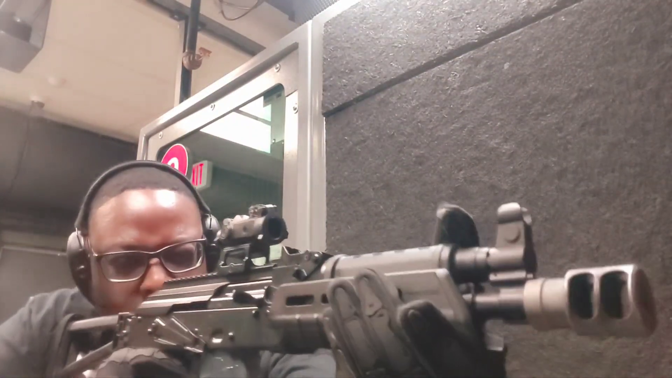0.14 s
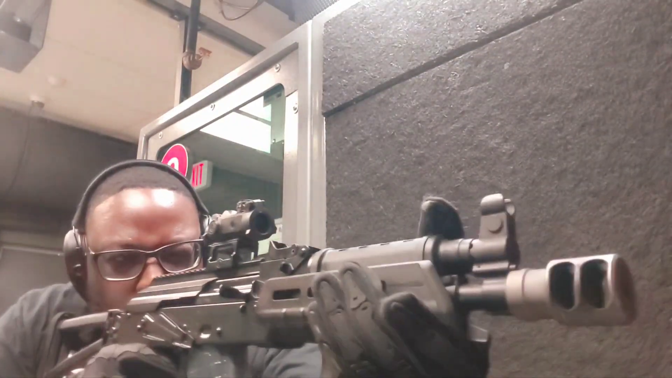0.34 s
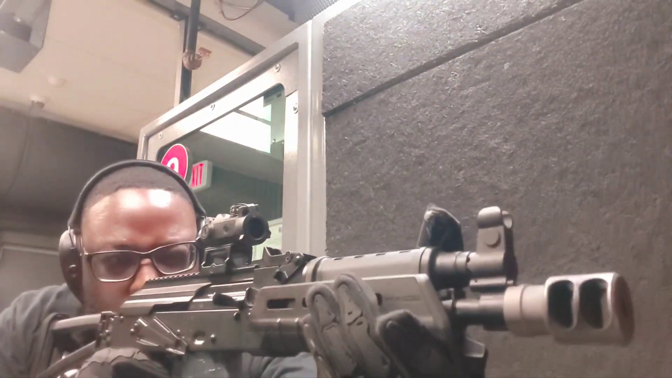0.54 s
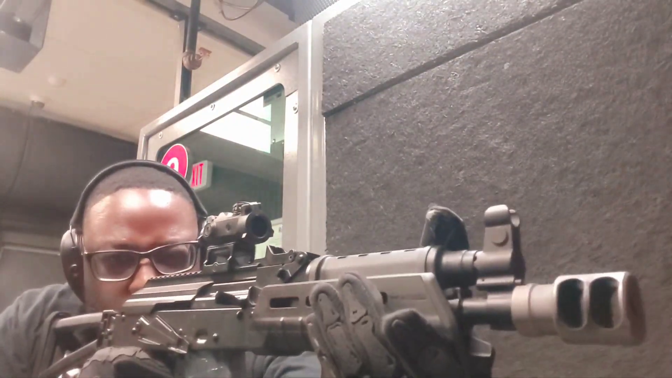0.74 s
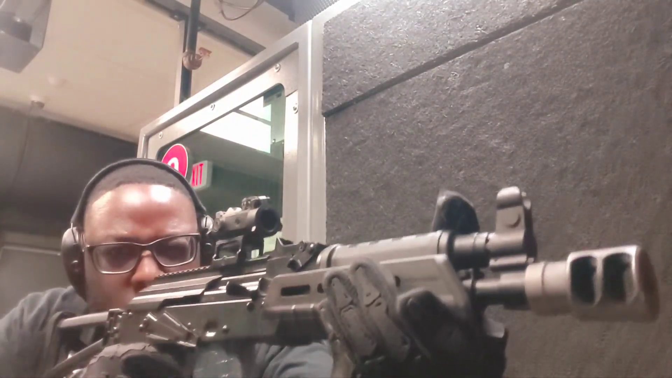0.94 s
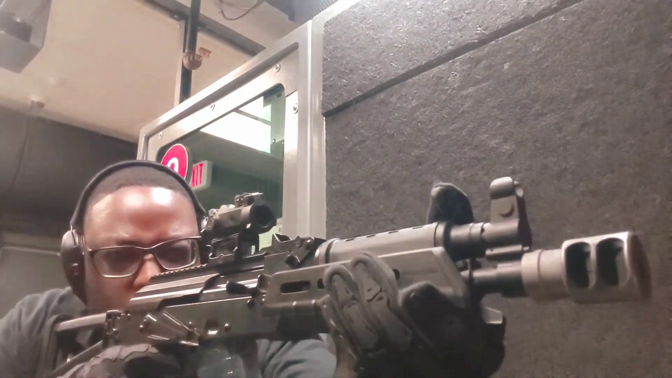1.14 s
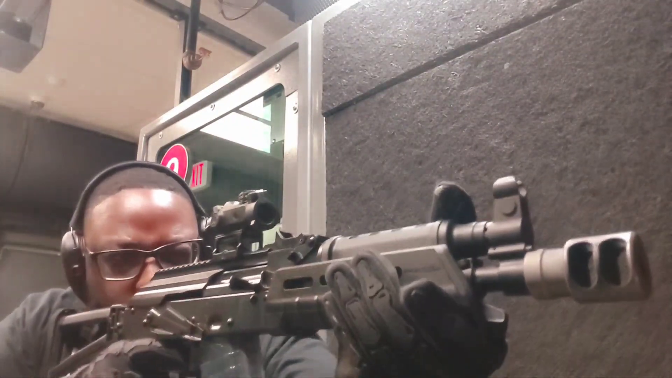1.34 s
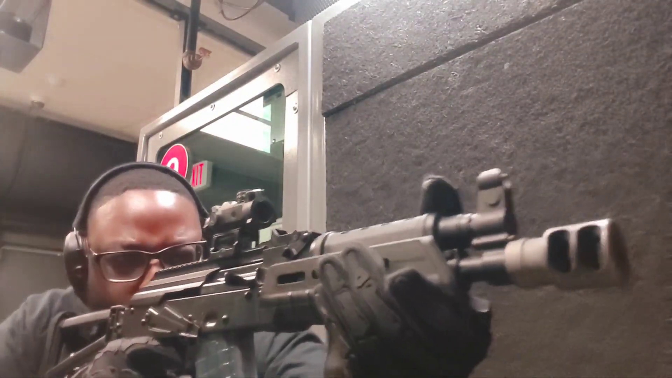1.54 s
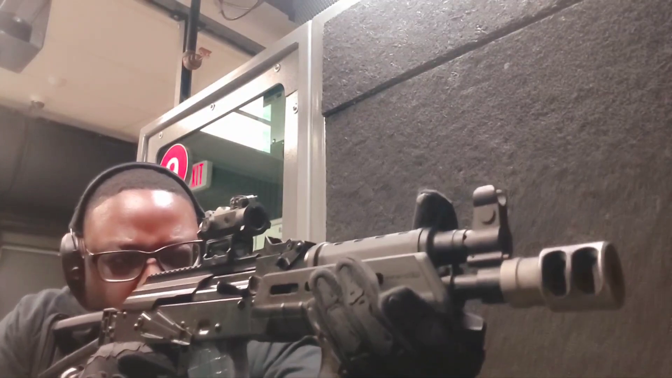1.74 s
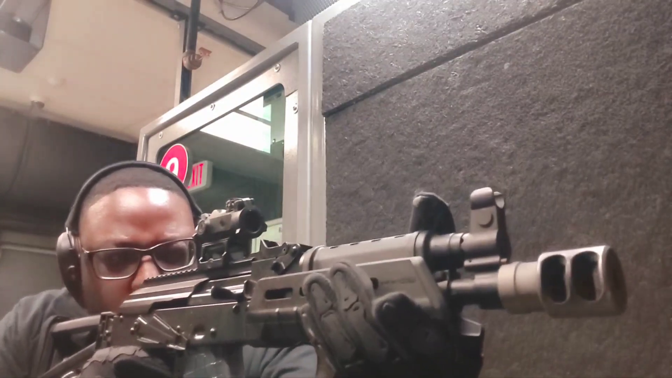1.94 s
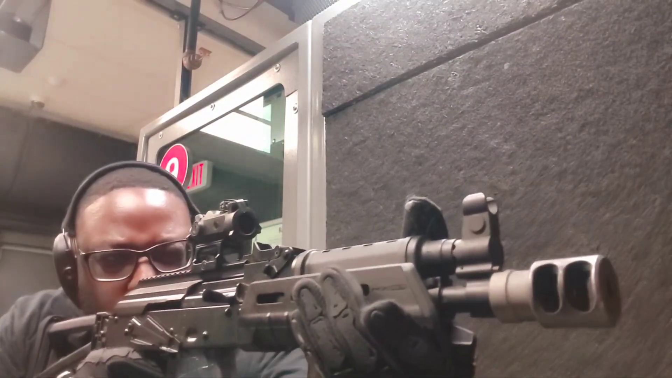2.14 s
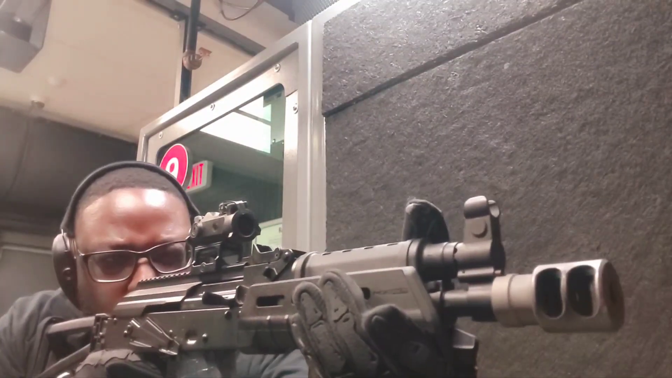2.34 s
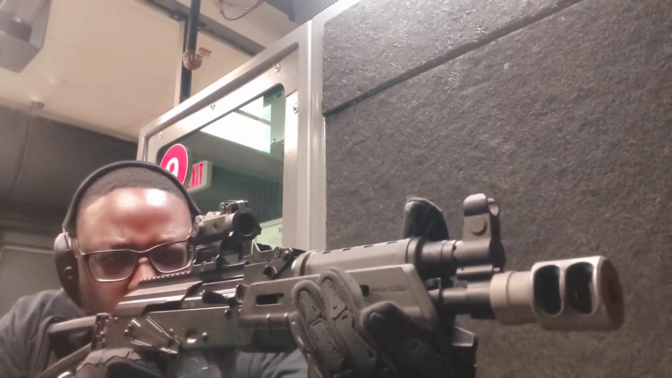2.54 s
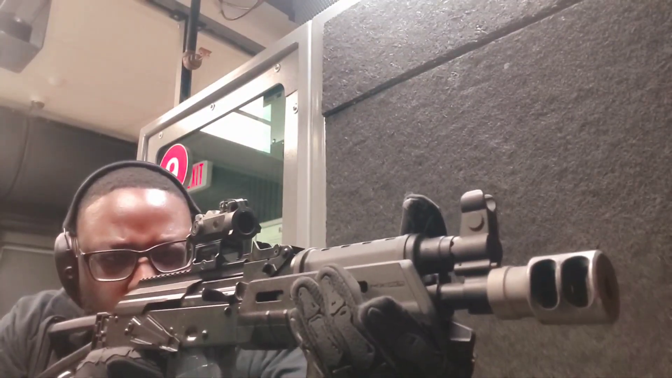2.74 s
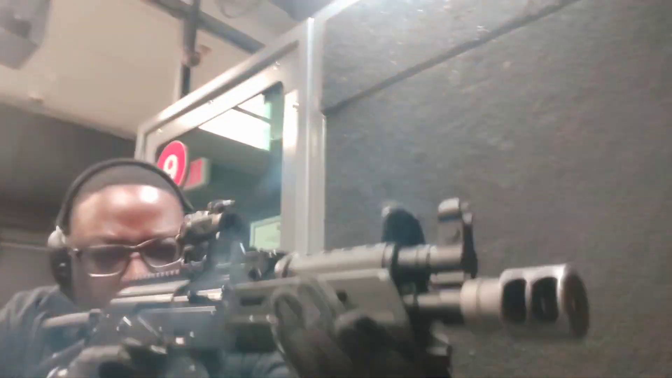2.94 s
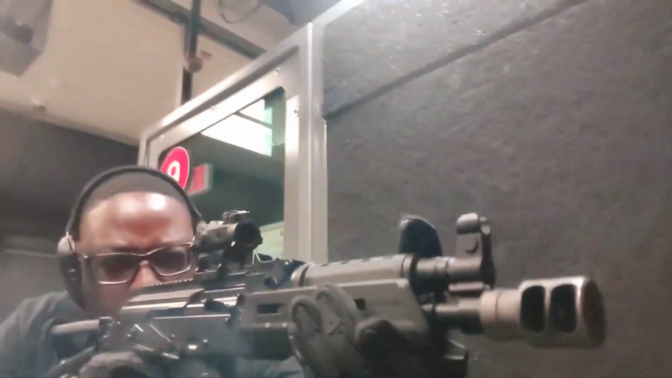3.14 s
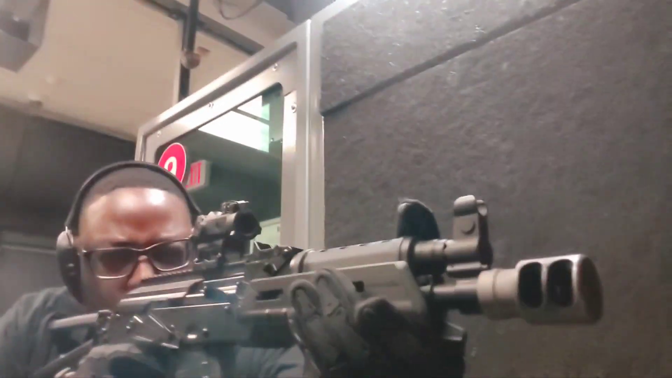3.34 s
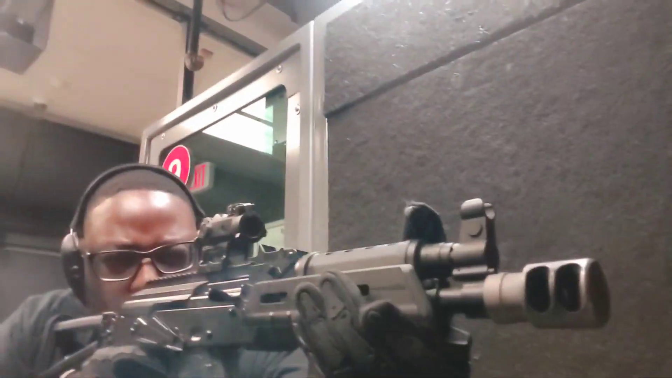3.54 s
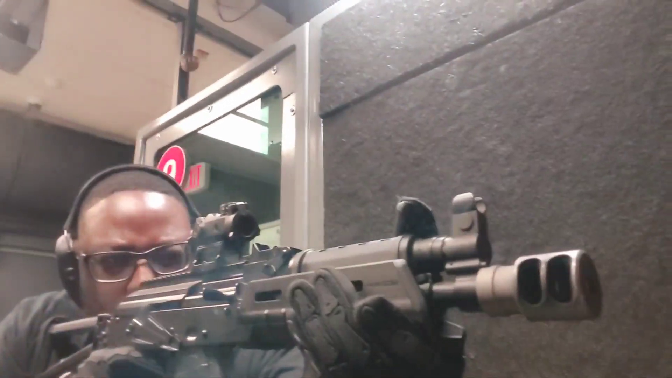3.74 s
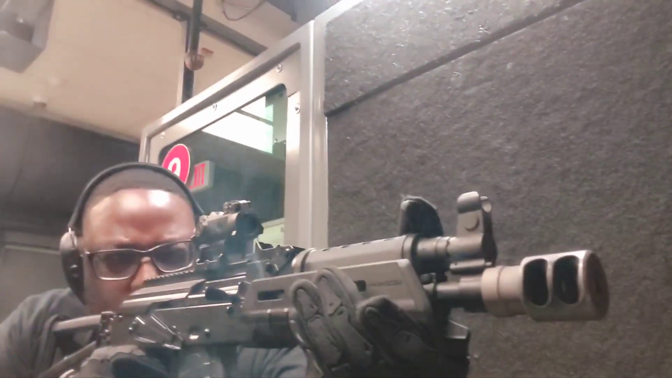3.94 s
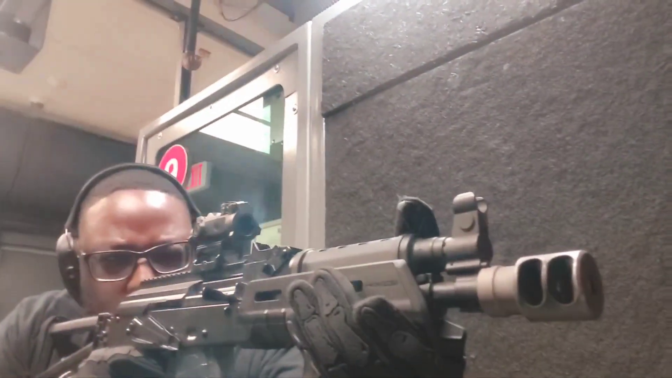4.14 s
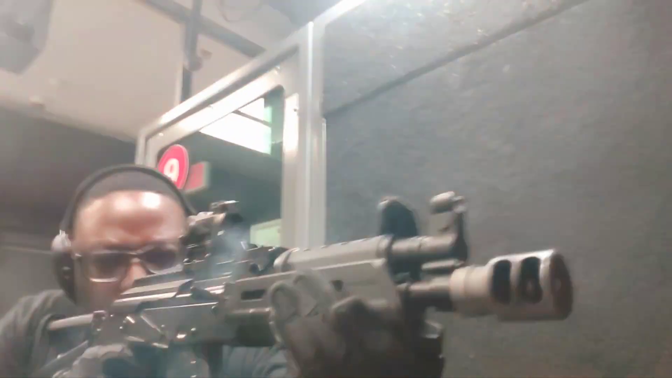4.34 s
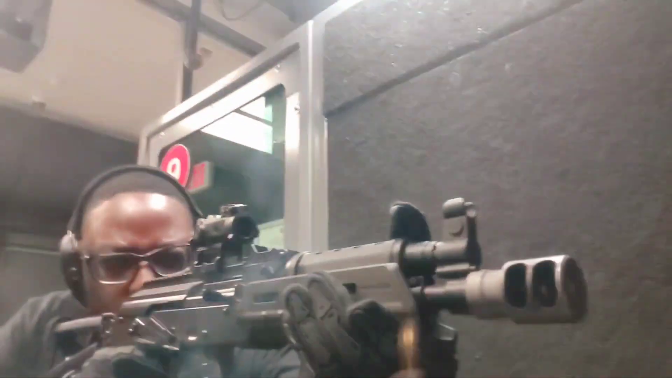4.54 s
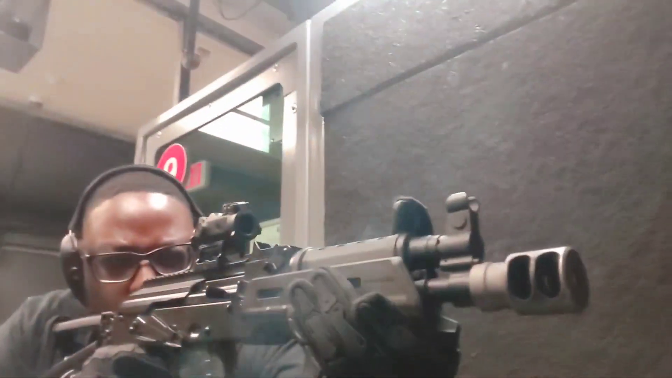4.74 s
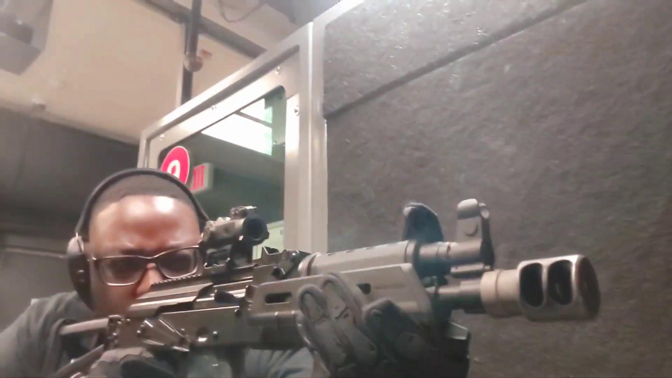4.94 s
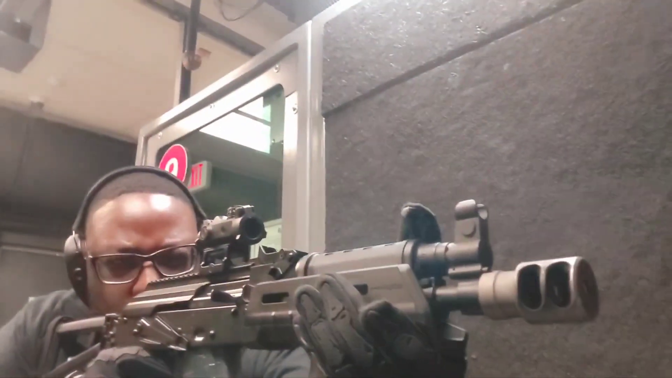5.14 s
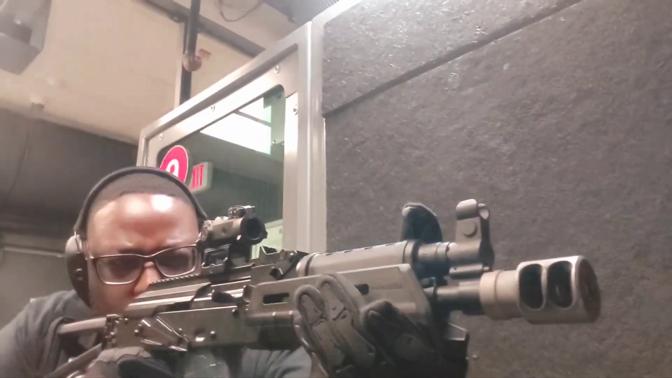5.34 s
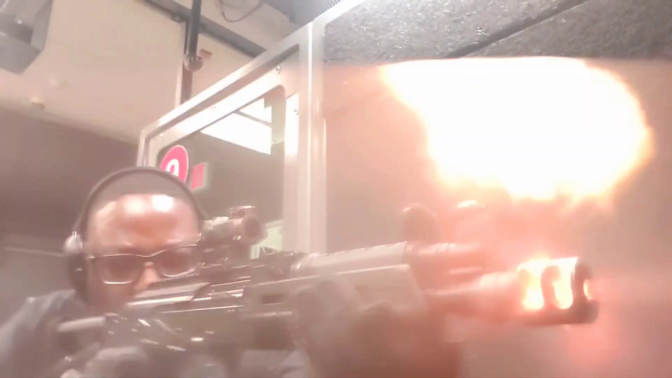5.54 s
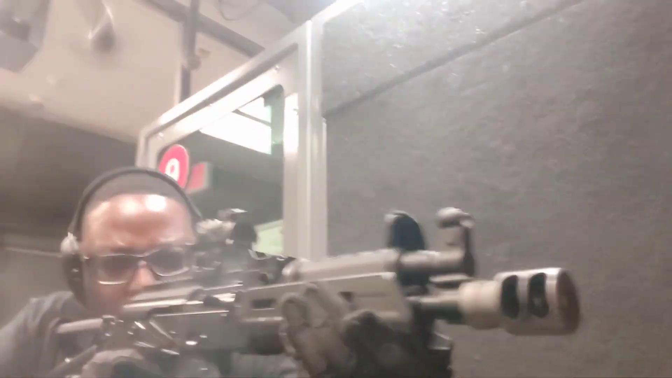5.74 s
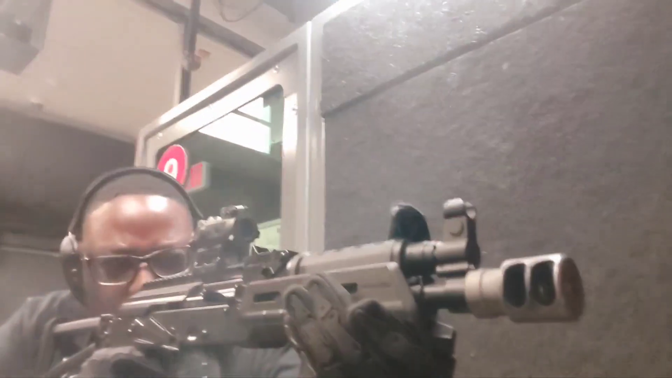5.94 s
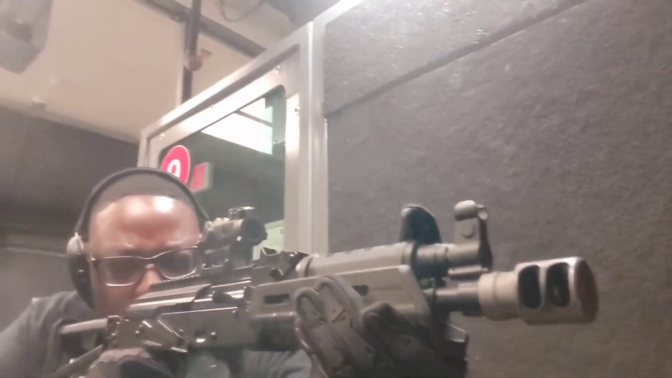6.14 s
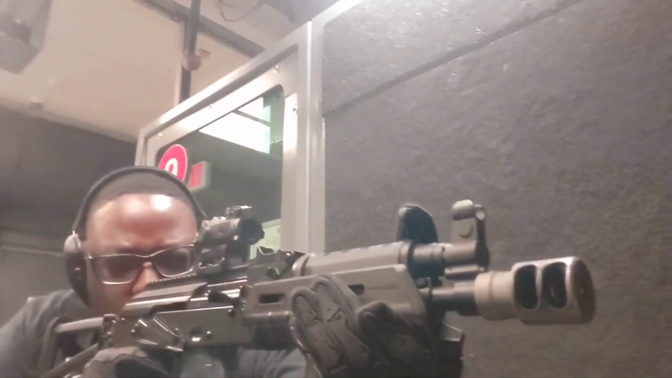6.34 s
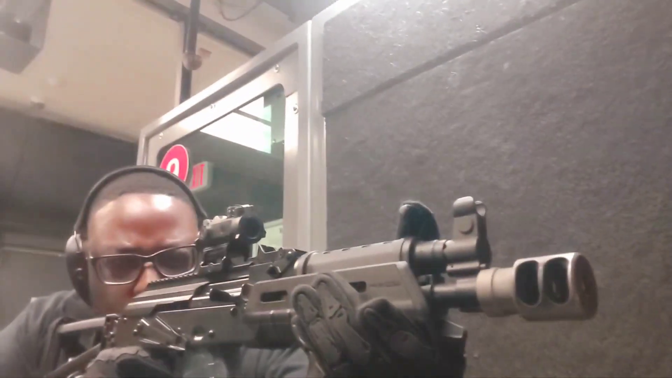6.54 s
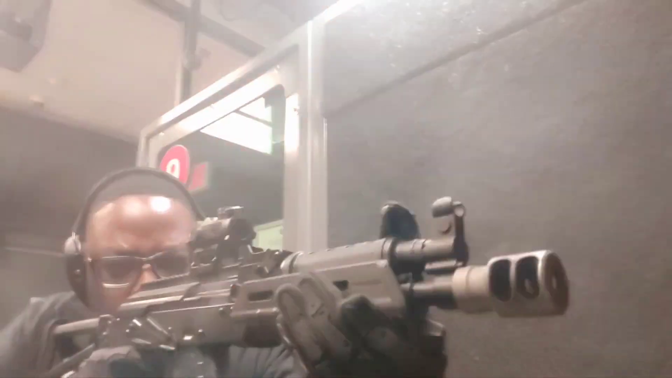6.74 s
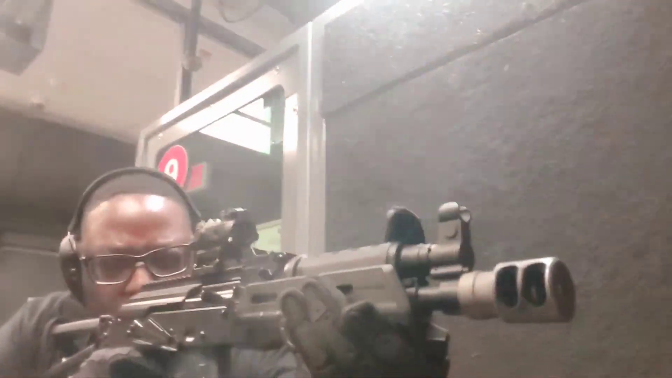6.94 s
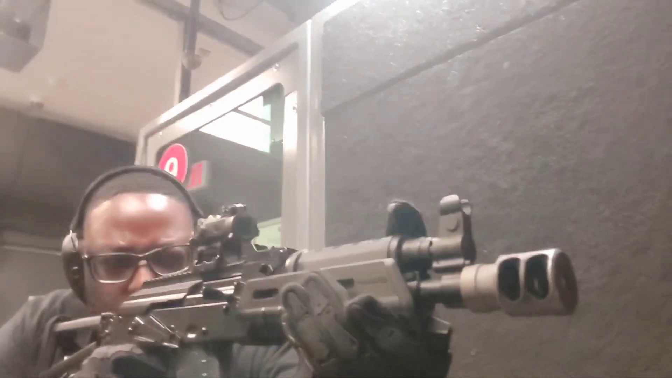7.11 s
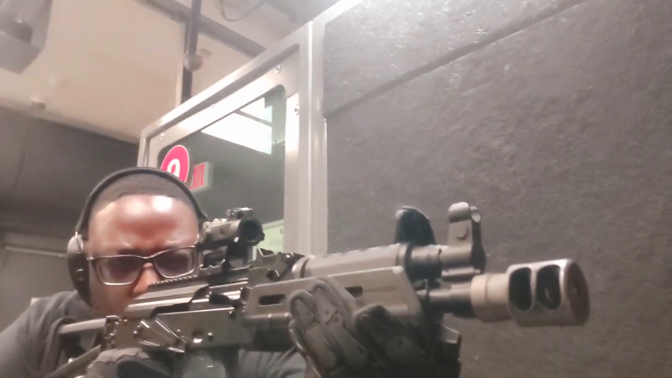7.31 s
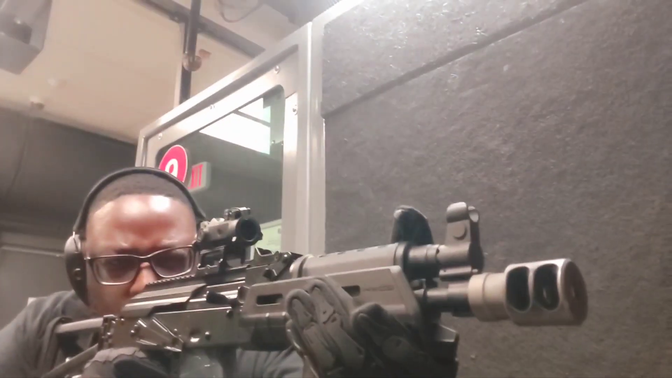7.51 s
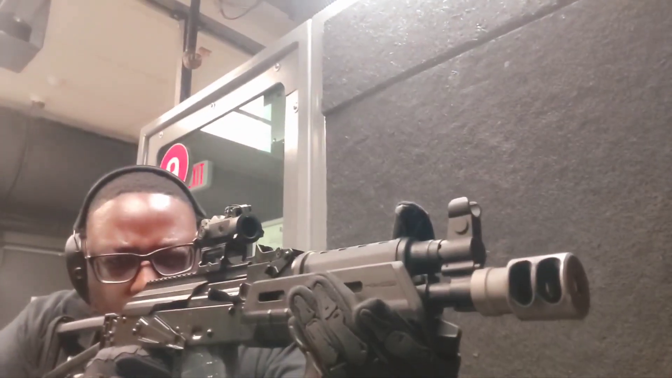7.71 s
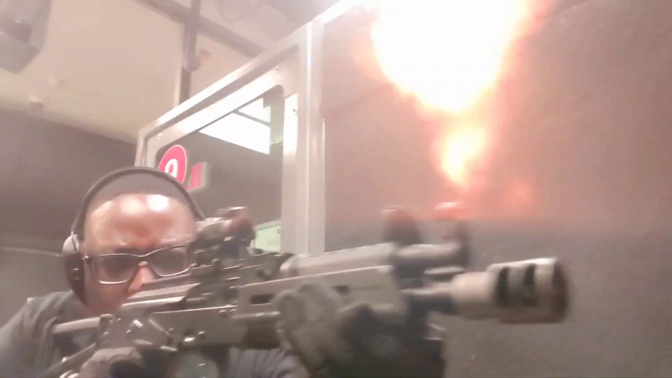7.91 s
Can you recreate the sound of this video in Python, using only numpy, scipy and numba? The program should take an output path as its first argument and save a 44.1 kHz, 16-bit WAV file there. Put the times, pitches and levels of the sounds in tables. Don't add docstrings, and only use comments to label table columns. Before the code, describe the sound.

In an indoor shooting range, five close rifle shots overload the microphone with roaring blasts and long echoes, amid far pistol shots and clinking brass.

```python
import sys
import numpy as np
from scipy import signal
from scipy.fft import rfft, irfft
from scipy.io import wavfile
from scipy.ndimage import uniform_filter1d
from numba import njit

SR = 44100
rng = np.random.default_rng(int(sys.argv[2]) if len(sys.argv) > 2 else 0)


def magnitude_from_level(level_db):
    exponent = np.asarray(level_db, float) / 20
    return 10 ** exponent


def wav_out(sig):
    wavfile.write(sys.argv[1], SR, np.round(np.clip(np.atleast_2d(sig).T, -1, 1) * 32767).astype(np.int16))


N = 355887
HOP = 64


def table(rows, hz):
    f, v = np.transpose(rows)[:2]
    return np.interp(np.log(hz), np.log(f), v)


def shares_db(rows, hz):
    power = 10 ** (table(rows, hz) / 10) * hz
    return 10 * np.log10(power / power.sum())


def modes(rows):
    t = np.arange(int(SR * max(row[2] for row in rows))) / SR
    return sum(magnitude_from_level(db - 60 * t / t60) * np.sin(2 * np.pi * hz * t) for hz, db, t60 in rows)


def walk(rate, size):
    k = max(int(SR / HOP / rate), 1)
    steps = np.repeat(rng.standard_normal(size // k + 1), k)
    return 1.3 * uniform_filter1d(steps, k)[:size]


def strikes(sound, rows, db):
    out = np.zeros(N + SR + len(sound))
    for row, gain in zip(rows, magnitude_from_level(db + np.zeros(len(rows)))):
        start = int(row[0] * SR) + SR
        out[start:start + len(sound)] += gain * sound
    return out[SR:SR + N]


# [f/Hz, level/dB]
FAN_COLOUR = [(15, -46), (25, -16), (76, 0), (249, -5), (331, -12), (527, -12), (776, -23), (1000, -16),
              (3380, -31), (9000, -55), (12000, -57), (15600, -64), (17000, -110)]
AIR_LOW_DB, AIR_HIGH_DB, AIR_DUCKED_DB = -62, -39, -60
AIR_OPENS_S, AIR_RISE_S = .97, .17


def ventilation_power(s, hz):
    opening = 1 / (1 + np.exp((AIR_OPENS_S - s) / AIR_RISE_S))
    swell_db = AIR_LOW_DB + (AIR_HIGH_DB - AIR_LOW_DB) * opening
    air_db = np.where(s < FAR_SHOTS[1][0], swell_db, AIR_DUCKED_DB)
    return magnitude_from_level(2 * (shares_db(FAN_COLOUR, hz)[:, None] + air_db))


# [t/s, level/dB]
TINKLES = [(.262, -80), (.70, -82), (.935, -73), (1.115, -75), (1.235, -76), (2.765, -72), (3.29, -86),
           (3.455, -85), (3.575, -87), (5.197, -80), (5.438, -84), (3.72, -89), (7.39, -90), (7.55, -86)]
# [f/Hz, level/dB, t60/s]
TINKLE_TONES = [(10760, 0.1, .5), (10830, -2, .4), (10680, -5, .3)]
TINKLE_ATTACK_S, TINKLE_HISS_DB, TINKLE_HISS_T60_S = .012, -13, .5


def tinkles():
    ring = modes(TINKLE_TONES)
    t = np.arange(len(ring)) / SR
    hiss = np.diff(rng.standard_normal(SR))[:len(t)]
    hiss = hiss * magnitude_from_level(TINKLE_HISS_DB - 60 * t / TINKLE_HISS_T60_S)
    waver = np.repeat(magnitude_from_level(3 * walk(70, N // HOP + 1)), HOP)
    waver = uniform_filter1d(waver, size=300)[:N]
    soft_start = 1 - np.exp(-t / TINKLE_ATTACK_S)
    far = strikes((ring + hiss) * soft_start, TINKLES, np.transpose(TINKLES)[1])
    return waver * far * magnitude_from_level(np.array([[0.5], [6]]))


# [t/s, level/dB]
RUSTLES = [
    (.695, -61),
    (1.24, -68),
    (2.75, -60),
]
SLING_HZ, SLING_WIDTH_HZ, SLING_T60_S = 5200, 600, .4
HAMMER_LEAD_S, HAMMER_DB = .0065, -42


def trigger():
    t = np.arange(int(SR * HAMMER_LEAD_S)) / SR
    scrape = np.diff(rng.standard_normal(SR // 50))[:len(t)] * (.3 + t / HAMMER_LEAD_S)
    lock = strikes(scrape, np.array(NEAR_SHOTS) - HAMMER_LEAD_S, HAMMER_DB)
    t = np.arange(SR // 4) / SR
    band = signal.iirpeak(SLING_HZ, SLING_HZ / SLING_WIDTH_HZ, fs=SR)
    crackle = magnitude_from_level(3.0 * rng.standard_normal(len(t) // HOP + 1).repeat(HOP)[:len(t)])
    rustle = signal.lfilter(*band, rng.standard_normal(len(t)) * crackle)
    strap = strikes(rustle * magnitude_from_level(-60 * t / SLING_T60_S), RUSTLES, np.transpose(RUSTLES)[1])
    return (lock + strap) * magnitude_from_level(np.array([[-6], [3]]))


# [t/s, click level/dB, ring level/dB]
CASE_HITS = [(2.9924, -24, -55), (4.3944, -21, -50), (4.5276, -30, -53), (4.5334, -33, -54),
             (4.7446, -24, -35), (4.7574, -35, -39), (4.7684, -36, -53), (4.7915, -45, -61),
             (4.8559, -49, -54), (4.9414, -64, -54), (4.9726, -38, -43), (4.993, -54, -62),
             (6.0057, -36, -37), (6.3194, -34, -55), (6.8934, -22, -54), (7.0224, -23, -54),
             (7.0274, -17, -48), (7.2848, -39, -52), (7.3244, -48, -56), (7.6116, -51, -71),
             (7.783, -64, -54), (7.7912, -58, -53)]
# [f/Hz, level/dB, t60/s]
BRASS_TONES = [(12750, -9, .12), (13180, -1, .07), (13330, -8, .04), (12930, -7, .33), (8200, -10, .025),
               (5100, -10, .035), (2900, -6, .035)]
# [t/s, level/dB]
PANEL_KNOCKS = [
    (4.758, -36),
    (4.794, -29),
    (4.812, -36),
    (7.575, -56),
]
# [f/Hz, level/dB, t60/s]
PANEL_TONES = [(420, 0.1, .05), (610, -3, .04), (720, -2, .04)]
# [f/Hz, level/dB, t60/s]
CLANK_TONES = [(1850, -3, .02), (2140, 0.1, .03), (2450, -4, .02), (2900, -6, .02)]
CLANK_S, CLANK_DB = 7.027, -20
CASE_PAN_DB = -8
CLICK_T60_S, CLICK_TAIL_T60_S, CLICK_TAIL_DB, RING_ATTACK_S = .009, .2, -26, .003
ROLL_S, ROLL_TURNS, TURN_S, TURN_WOBBLE_S = 5.105, 7, .057, .012
ROLL_CLICK_DB, ROLL_RING_DB, ROLL_FADE_DB, TURN_WOBBLE_DB = -72, -66, -.6, 3.5


def cases():
    turn = np.arange(ROLL_TURNS)[:, None]
    roll = [ROLL_S, ROLL_CLICK_DB, ROLL_RING_DB] + turn * [TURN_S, ROLL_FADE_DB, ROLL_FADE_DB]
    wobble = rng.standard_normal((ROLL_TURNS, 3)) * [TURN_WOBBLE_S, TURN_WOBBLE_DB, TURN_WOBBLE_DB]
    hits = np.vstack([CASE_HITS, roll + wobble])
    _, click_db, ring_db = hits.T
    t = np.arange(SR // 6) / SR
    fall = magnitude_from_level(-60 * t / CLICK_T60_S) + magnitude_from_level(CLICK_TAIL_DB - 60 * t / CLICK_TAIL_T60_S)
    bright = signal.butter(1, (1700, 9000), "band", fs=SR, output="sos")
    knocks = strikes(modes(PANEL_TONES), PANEL_KNOCKS, np.transpose(PANEL_KNOCKS)[1])
    knocks = knocks + strikes(modes(CLANK_TONES), [(CLANK_S,)], CLANK_DB)
    spin = np.repeat(magnitude_from_level(4 * walk(60, N // HOP + 1)), HOP)
    spin = uniform_filter1d(spin, size=256)[:N]
    brass = modes(BRASS_TONES)
    brass = brass * (1 - np.exp(-np.arange(len(brass)) / SR / RING_ATTACK_S))
    out = []
    for sign in (.5, -.5):
        pan_db = sign * CASE_PAN_DB
        noise = signal.sosfilt(bright, rng.standard_normal(N))
        rasp = noise * strikes(fall, hits, click_db + 1.6 + pan_db)
        ring = spin * strikes(brass, hits, ring_db - 5.0 + pan_db)
        out.append(rasp + ring + knocks)
    return np.array(out)


BOLT_LAG_S, BOLT_SPREAD_S, BOLT_DB = .093, .006, -31


def bolt():
    t = np.arange(SR // 5) / SR
    steel = np.diff(rng.standard_normal((2, N + 2)), 2)
    burst = np.exp(-.5 * ((t - BOLT_LAG_S) / BOLT_SPREAD_S) ** 2)
    return steel * strikes(burst, NEAR_SHOTS, BOLT_DB)


def surge(rows, delay_s, spread_s, apart):
    t = np.arange(SR // 2) / SR
    push = rng.standard_normal((2, len(t))) * np.exp(-.5 * ((t - delay_s) / spread_s) ** 2)
    push = signal.sosfilt(signal.butter(4, 62, "high", fs=SR, output="sos"), push)
    push = push / np.sqrt(np.sum(push[0] ** 2))
    sides = [push[0] + apart * push[1], push[0] - apart * push[1]]
    return signal.fftconvolve(sides, modes(rows)[None])


# [f/Hz, level/dB, t60/s]
HALL_TONES = [(63, -12, 1.1), (73, 0.1, 1.1), (98, -7, .9), (110, 0.1, .85), (122, -5, .8), (135, -5, .8),
              (152, -3, .75), (227, -12, .45), (262, -16, .4)]
# [f/Hz, level/dB, t60/s]
BOOTH_TONES = [(398, -2, .16), (500, -1, .2), (528, -4, .2), (690, -5, .15), (1035, -4, .2)]
BOOM_DELAY_S, BOOM_SPREAD_S, BOOTH_DB = .2, .045, -22


def boom():
    shots = np.array([*NEAR_SHOTS, *FAR_SHOTS])
    hall_surge = surge(HALL_TONES, BOOM_DELAY_S, BOOM_SPREAD_S, apart=.35)
    hall = np.array([strikes(side, shots, shots[:, 3]) for side in hall_surge])
    booth_surge = surge(BOOTH_TONES, .085, .03, apart=.7)
    booth = np.array([strikes(side, shots, BOOTH_DB) for side in booth_surge])
    return hall * magnitude_from_level(np.array([[1.5], [-1.5]])) + booth * magnitude_from_level(np.array([[3], [-4]]))


# [delay t/s, level/dB]
FRONT_ARRIVALS = [
    (0.0006, -1),
    (.0021, -7),
    (.0037, -9),
    (.0062, -9),
    (.0085, -12),
]
FRONT_HZ, FRONT_SPREAD_S = 950, .0007
THUD_HZ, THUD_SPREAD_S, THUD_DB = 110, .007, -17


def fronts():
    t = np.arange(SR // 25) / SR
    swing = 0
    for lag, db in FRONT_ARRIVALS:
        pulse = np.exp(-((t - lag) / FRONT_SPREAD_S) ** 2)
        swing = swing - magnitude_from_level(db) * np.cos(2 * np.pi * FRONT_HZ * (t - lag)) * pulse
    push = np.exp(-.5 * (t / THUD_SPREAD_S - 1) ** 2)
    swing = swing + magnitude_from_level(THUD_DB) * np.sin(2 * np.pi * THUD_HZ * t) * push
    return strikes(swing, FAR_SHOTS, 1.5) * magnitude_from_level(np.array([[1.2], [-2.5]]))


# [f/Hz, t60/s]
ROAR_T60 = [(100, .45), (500, .45), (1000, .36), (5000, .3), (14000, .19)]
# [f/Hz, t60/s]
HALL_T60 = [(40, 1.2), (100, 1.05), (300, 1.0), (1000, 1.15), (3000, 1.05), (8000, .7), (12000, .4),
            (15000, .3)]
# [f/Hz, left minus right level/dB]
HALL_BALANCE = [(60, -.3), (250, -1.5), (700, 2.2), (2700, -.6), (6400, -8), (8100, -10), (12800, -3.5),
                (16000, -8)]
LATE_T60_S, LATE_DB = 2.7, -19.3
ROAR_DB = -12
BASS_LAG_S, BASS_LAG_DB, BASS_LAG_HZ = .16, -5, 200


def shot_power(s, hz, shots, roar, balance, hall, tail, swell_s):
    hz = hz[:, None]
    left = right = wet = 0
    for t0, hold, hall_db, _, tilt in shots:
        t = np.maximum(s - t0, 0)
        rise = (1 - np.exp(-t * np.minimum(5 * hz, 2500))) ** 2
        tilt_db = tilt * np.log2(hz / 1000)
        thump_db = 4.5 / (1 + (hz / 330) ** 4)
        thump_db = thump_db + BASS_LAG_DB * np.exp(-(t / BASS_LAG_S) ** 2) / (1 + (hz / BASS_LAG_HZ) ** 2)
        over = .02 * np.logaddexp(0, (t - hold * (1000 / hz) ** .15) / .02)
        fade_db = 60 * over / table(ROAR_T60, hz)
        flat = rise * magnitude_from_level(2 * (ROAR_DB + tilt_db + thump_db + shares_db(roar, hz) - fade_db))
        flat = flat * (1 - .8 * np.exp(-(t / swell_s) ** 2))
        lean = table(balance, hz) * np.exp(-(t / .1) ** 2)
        ports = table(HALL_BALANCE, hz)
        left = left + flat * magnitude_from_level(ports + .75 * lean)
        right = right + flat * magnitude_from_level(-ports - 1.25 * lean)
        since = t - hold - .1
        early = shares_db(hall, hz) + tilt_db - 60 * since / table(HALL_T60, hz)
        late = shares_db(tail, hz) + LATE_DB - 60 * since / LATE_T60_S
        emerge = (t > 0) / (1 + np.exp(-(t - hold * (400 / hz) ** .17) / .025)) ** 2
        wet = wet + (magnitude_from_level(2 * (hall_db + early)) + magnitude_from_level(2 * (hall_db + late))) * emerge
    return np.array([left, right, wet])


@njit
def add(out, a, b, gains, slope, hop):
    wrap = len(a) - 1
    for i in range(out.shape[1]):
        k = i // hop
        j = i - k * hop
        here = i & wrap
        there = (i + 40000) & wrap
        out[0, i] += (gains[0, k] + j * slope[0, k]) * a[there] + (gains[2, k] + j * slope[2, k]) * a[here]
        out[1, i] += (gains[1, k] + j * slope[1, k]) * b[there] + (gains[3, k] + j * slope[3, k]) * b[here]


# [t/s, roar held/s, hall level/dB, boom level/dB, treble tilt/dB per octave]
NEAR_SHOTS = [
    (2.803, .11, -16.5, -10.5, 0.8),
    (4.220, .13, -15.5, -10.5, 0.8),
    (5.5592, .11, -16.5, -10.5, 0.8),
    (6.710, .105, -16.5, -10.5, 0.8),
    (7.927, .11, -16.5, -10.5, 0.8),
]
# [t/s, held/s, hall level/dB, boom level/dB, tilt/dB per octave]
FAR_SHOTS = [
    (-.92, .08, -23, -35, -.3),
    (1.598, .095, -25, -36, -.3),
    (6.117, .07, -24, -35, -.3),
    (7.860, .045, -25, -35, .5),
]
# [f/Hz, level/dB]
NEAR_ROAR = [(24, -48), (40, -18), (124, -7), (320, -9), (392, 1), (467, -8), (680, -9), (751, -4),
             (965, -10), (1300, -8), (2260, -11), (5050, -18), (9220, -30), (12100, -22), (16000, -29)]
# [f/Hz, left minus right level/dB]
NEAR_BALANCE = [(60, 2.5), (150, 10.0), (1500, 12.0), (3000, 9.5), (8000, 13.0), (15000, 9.5)]
# [f/Hz, level/dB]
NEAR_HALL = [(24, -41), (40, -11), (63, 0), (118, -1), (185, -13), (402, -18), (697, -30), (918, -23),
             (1040, -29), (2770, -36), (5310, -47), (9500, -61), (12500, -60), (16000, -72)]
# [f/Hz, level/dB]
NEAR_LATE = [(30, -26), (55, -4), (124, -3), (300, -17), (460, -19), (670, -28), (900, -23), (1250, -22),
             (2500, -28), (5000, -47), (10000, -70), (16000, -100)]
# [f/Hz, level/dB]
FAR_ROAR = [(24, -41), (40, -20), (87, -11), (354, -6), (479, 0), (790, -5), (896, -1), (965, -2),
            (1300, -5), (1760, -9), (4030, -14), (8130, -24), (9220, -31), (12100, -22), (16000, -31)]
# [f/Hz, left minus right level/dB]
FAR_BALANCE = [(60, 3.0), (700, 5.0), (2400, 5.0), (15000, 2.5)]
# [f/Hz, level/dB]
FAR_HALL = [(29, -34), (50, -12), (80, -4), (145, -1), (189, -5), (646, -15), (973, -12), (1660, -21),
            (2400, -21), (9500, -49), (12900, -50), (16000, -62)]
# [f/Hz, level/dB]
FAR_LATE = [(29, -27), (50, 3), (124, -11), (181, -5), (459, -13), (599, -21), (1240, -12), (2500, -22),
            (10000, -62), (13000, -92), (22000, -120)]


def blasts_and_air():
    s = np.arange(N // HOP + 2) * HOP / SR
    hz = 25 * 2 ** np.arange(0, 9.4, 1 / 3)
    power = shot_power(s, hz, NEAR_SHOTS, NEAR_ROAR, NEAR_BALANCE, NEAR_HALL, NEAR_LATE, swell_s=.0015)
    power = power + shot_power(s, hz, FAR_SHOTS, FAR_ROAR, FAR_BALANCE, FAR_HALL, FAR_LATE, swell_s=.045)
    power[2] += ventilation_power(s, hz)
    size = 2 ** 17
    octave = np.log2(np.maximum(np.arange(size // 2 + 1), 1) * SR / size)
    mid, side = rfft(rng.standard_normal((2, size)))
    out = np.zeros((2, N))
    for k, f in enumerate(hz):
        mask = np.cos(np.clip(3 * (octave - np.log2(f)), -1, 1) * np.pi / 2)
        alike = .92 / (1 + (f / 330) ** 2)
        same = mid * mask * np.sqrt(.5 + alike / 2)
        apart = side * mask * np.sqrt(.5 - alike / 2)
        flutter = magnitude_from_level(1.2 * walk(25, len(s)))
        left, right, wet = np.sqrt(power[:, k] / np.mean(mask ** 2)) * flutter
        pan = magnitude_from_level(table(HALL_BALANCE, f) / 2)
        gains = np.array([left, right, wet * pan, wet / pan])
        add(out, irfft(same + apart, size), irfft(same - apart, size), gains, np.diff(gains) / HOP, HOP)
    return out


def scene():
    background = tinkles() + trigger() + cases() + bolt()
    return background + boom() + fronts() + blasts_and_air()


def top_cut(x):
    return signal.sosfilt(signal.butter(12, 16810, fs=SR, output="sos"), x)


def record(dry):
    x = signal.sosfilt(signal.butter(3, 62, "high", fs=SR, output="sos"), dry)
    x = signal.lfilter(*signal.iirnotch(9700, 9, fs=SR), x) * .4 + x * .6
    dip = signal.lfilter(*signal.iirpeak(9100, 3.2, fs=SR), x[0])
    x = x - [.92 * dip, 0 * dip]
    swing = np.sqrt(np.maximum(uniform_filter1d(x ** 2, size=180), 0))
    x = x / (1 + (swing / .42) ** 4) ** .2
    rounded = x / (1 + np.abs(x / 1.05) ** 4) ** .25
    top = signal.ellip(9, .2, 48, 15850, fs=SR, output="sos")
    return top_cut(signal.sosfilt(top, rounded))


dry = scene()
out = record(dry)
wav_out(out)
```